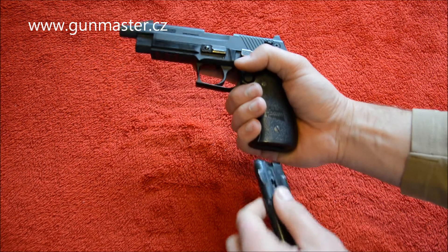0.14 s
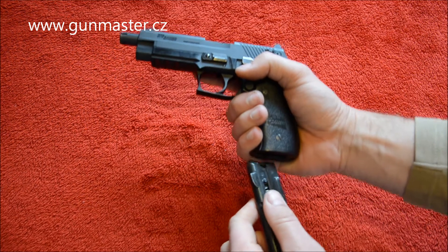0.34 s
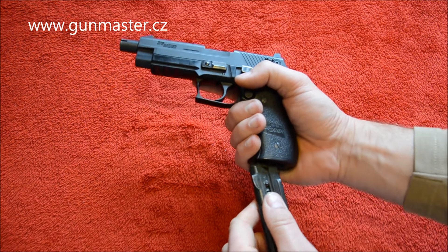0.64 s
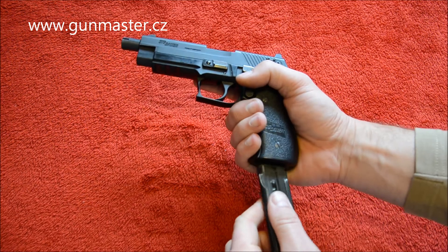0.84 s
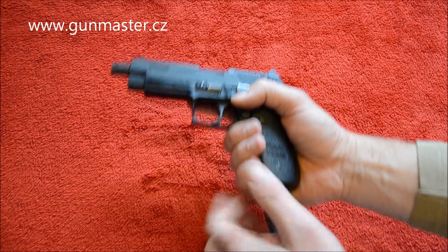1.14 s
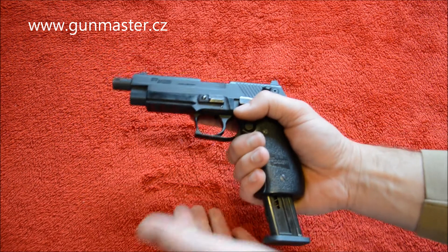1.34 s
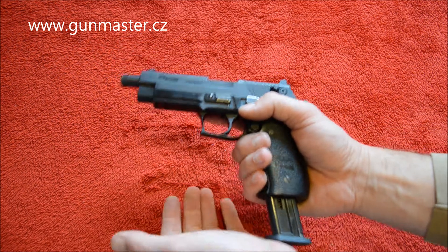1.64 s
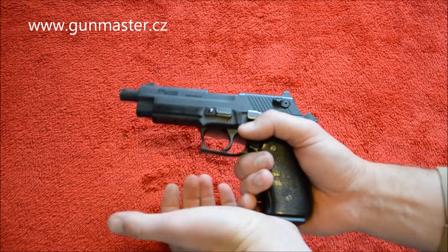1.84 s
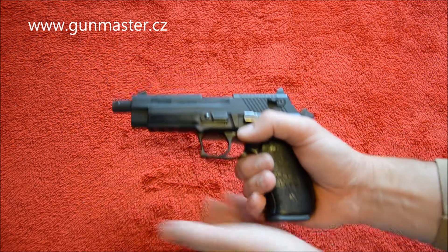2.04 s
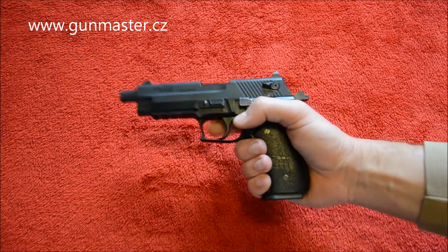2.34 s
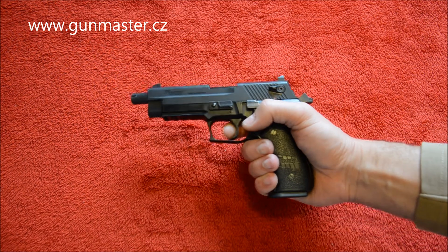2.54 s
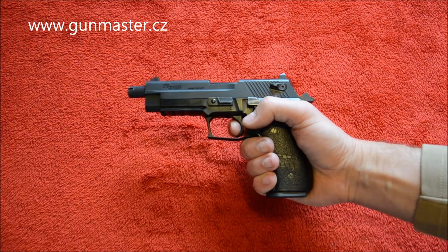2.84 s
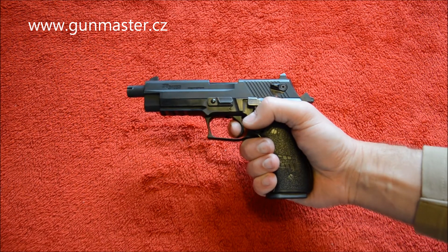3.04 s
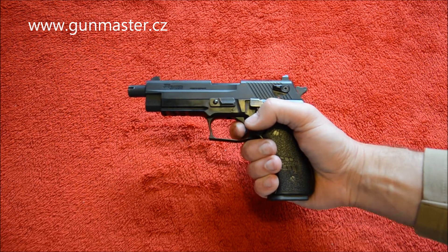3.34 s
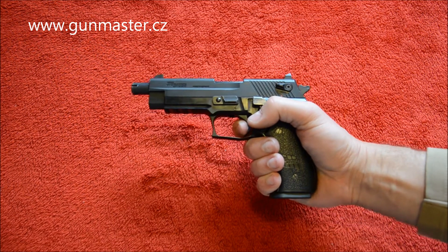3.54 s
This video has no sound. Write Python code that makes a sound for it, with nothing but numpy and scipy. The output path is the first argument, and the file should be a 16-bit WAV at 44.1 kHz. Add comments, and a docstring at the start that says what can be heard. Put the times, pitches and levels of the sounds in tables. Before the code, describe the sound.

Pistol handling: magazine rattles into the grip, is slammed home, then a sharp dry-fire click.

```python
"""Over a steady room hiss and a thin whine, a magazine slides into a small pistol's grip in jerks,
with low handling drones, and is slapped home; then a lever clicks, the trigger creeps and the hammer falls.
Each contact pushes and cracks the grip, magazine, frame and small steel parts into damped ringing, and rubbing
feeds them random grit; a hard room answers. A microphone colours it all and clips the loudest blows."""
import sys
import numpy as np
from scipy import signal
from scipy.fft import rfft, irfft
from scipy.io import wavfile
from scipy.ndimage import uniform_filter1d

SR = 44100
rng = np.random.default_rng(int(sys.argv[2]) if len(sys.argv) > 2 else 0)


def decibels_to_gain(level_db):
    """Convert a level in decibels to a linear amplitude gain (20 dB per decade)."""
    exponent = np.asarray(level_db, float) / 20
    return 10 ** exponent


def generate_wav(signal):
    """Clip the signal to [-1, 1] and save it as 16-bit WAV at the path in sys.argv[1]."""
    frames = np.transpose(np.atleast_2d(signal))
    scaled = np.clip(frames, -1, 1) * 32767
    pcm = np.round(scaled).astype(np.int16)
    wavfile.write(sys.argv[1], SR, pcm)


N = 163170

# room hiss spectrum, relative density: pitch_hz, level_db (per Hz)
HISS_SPECTRUM = [(25, -22), (60, -8), (100, -3), (300, -1.5), (500, -1.5), (1000, -8), (2000, -12),
                 (4000, -16), (7500, -23), (10000, -32.5), (15000, -35)]
# low drones of handling: start_s, length_s, pitch_hz, width_hz, level_db
DRONES = [(1.085, 0.107, 171, 24, -56.5), (1.11, 0.043, 400, 300, -49), (1.557, 0.093, 167.6, 40.2, -61),
          (1.907, 0.56, 329, 89, -62)]
# room decay: pitch_hz, t60_s
ROOM_T60 = [(300, .6), (1000, .55), (3000, .6), (6000, .5), (9000, .41), (12000, .31), (15000, .22)]
# tone of the room's answer: pitch_hz, level_db
ROOM_COLOUR = [(300, 9.5), (1000, -5.5), (3000, -4.5), (9000, -3), (15000, -3)]
# ringing modes of each body: pitch_hz, level_db (relative), t60_s
GRIP = [(798, 0, 0.024), (1083.4, -13, 0.07), (1250, 0, .018), (1520, -2.5, 0.016)]
MAGAZINE = [(2050, -4, 0.012), (2310, -0.5, 0.025), (2469, -14, .08), (2700, -2, 0.016)]
FRAME = [(3680, -2.4, 0.0067), (4220, 1, 0.0036), (5500, -2.4, 0.0056)]
STEEL = [(6860, 5, 0.0018), (8620, 9.5, 0.0034), (9900, 1.5, 0.0053), (12400, -6.5, 0.0029)]
# the grip once filled by the magazine: pitch_hz, level_db (relative), t60_s
FILLED_GRIP = [(869, -12, 0.014), (1450, -2.5, .008), (1850, -1.5, 0.01)]
BODIES = GRIP, MAGAZINE, FRAME, STEEL
# rubbing: start_s, level_db, steel_trim_db (on top of the fixed blend of bodies)
SLIDE = [(.46, -78, -35), (.52, -55, -30), (.62, -86, -8), (.935, -84, 3), (.96, -64, 0), (1.05, -57.5, 1),
         (1.075, -44.5, 11.5), (1.11, -48.5, 2), (1.16, -49.5, -7), (1.19, -82, -4.5), (1.459, -80.5, -6.5),
         (1.497, -57.5, 2.5), (1.521, -69, -8), (1.61, -66, -7), (1.65, -51.5, 0), (1.701, -76, 9),
         (2.451, -91.5, 2), (2.48, -69.5, 8), (2.51, -87, -2), (3.1, -87.5, -5.5), (3.21, -62.5, 2),
         (3.66, -65.5, -1), (3.7, -66.5, 13)]
# blows, peak level at each body: start_s, grip_db, magazine_db, frame_db, steel_db
CONTACTS = [(0.4268, -63, -56.5, -48, -55), (0.5205, -53, -56, -52, -71), (0.7296, -45.5, -64, -65, -71),
            (0.7407, -63, -55, -48, -66), (0.7683, -31, -71, -52, -61), (0.863, -31, -35, -33, -46.5),
            (0.9561, -30, -43, -53.5, -54), (0.9721, -34, -37.5, -43.5, -63),
            (1.0131, -34.5, -40, -58.5, -65), (1.0485, -32.5, -42.5, -56, -64),
            (1.066, -32, -31.5, -37.5, -54), (1.0723, -31.5, -46.5, -48, -46),
            (1.1626, -62.5, -32.5, -30, -31), (1.1711, -22.5, -33, -24, -30.5),
            (1.1761, -19.5, -26, -24, -31.5), (1.1894, -29.5, -40, -32, -52),
            (1.4712, -46, -49, -62.5, -66.5), (1.5044, -43, -49.5, -45.5, -59), (1.651, -22, -36, -36, -45),
            (1.654, -22, -28, -17.5, -24.5), (1.672, -25, -32, -26.5, -30.5), (1.684, -30, -28, -23.5, -20),
            (1.6908, -16.5, -28, -12, -17), (1.6958, -24.5, -16, -5.5, -9.5),
            (1.702, -13, -16.5, -6.5, -10), (1.7052, -27.5, -20, -24, -20), (2.4987, -24, -30, -21, -21),
            (2.5045, -38, -46, -36.5, -50), (3.0186, -71, -57, -51.5, -49), (3.123, -73, -70.5, -60.5, -53),
            (3.1383, -65.5, -56.5, -46.5, -45.5), (3.2227, -37, -42.5, -30.5, -45),
            (3.2266, -20, -24, -16, -11), (3.2278, -7.5, -15.5, 1.5, -0.5), (3.2294, -8, -16, -5.5, -5.5),
            (3.2335, -21, -32.5, -9, -13), (3.2401, -21, -31, -11, -14), (3.2456, -22.5, -18, -8, -8),
            (3.2558, -50, -24.5, -11.5, -28), (3.2606, -32.5, -30.5, -14.5, -16),
            (3.6838, -51, -57, -46, -56)]
# crack against ring as the room hears it: grip_db, magazine_db, frame_db, steel_db
ROOM_CRACK_DB = 11, -3, 19, 13
# extra sent sideways into the room: grip_db, magazine_db, frame_db, steel_db
SIDEWAYS_DB = 0, 3.5, 0, 0
# microphone housing response: pitch_hz, level_db
MIC_HOUSING = [(800, -1.5), (980, 1.5), (2150, 0.5), (3050, 5.5), (3900, 1.5), (5250, 3.5), (5750, -12),
               (5950, 2.5), (6250, 2.5), (6750, 3), (6950, -11.5), (7200, 8), (7600, 5.5), (12000, -0.5),
               (16000, -15.5)]


def colour(x, table):
    """Filter by (Hz, dB) points with a causal response from the cepstrum."""
    size = 2048
    hz, db = np.array(table).T
    f = np.maximum(np.arange(size // 2 + 1) * SR / size, 1)
    curve_db = np.interp(np.log(f), np.log(hz), db)
    cepstrum = irfft(np.log(decibels_to_gain(curve_db)))
    # fold the later half forward: minimum phase
    cepstrum[1:size // 2] *= 2
    cepstrum[size // 2 + 1:] = 0
    response = irfft(np.exp(rfft(cepstrum)))
    return signal.fftconvolve(x, response)[:len(x)]


def unit(x):
    """Scale to rms 1."""
    return x / np.sqrt(np.mean(x ** 2))


def walk(rate_hz):
    """Random levels of rms 1, held 1 / rate_hz seconds and slewed twice."""
    hold = int(SR / rate_hz)
    steps = np.repeat(rng.standard_normal(N // hold + 1), hold)
    smooth = uniform_filter1d(uniform_filter1d(steps, hold), hold)
    return unit(smooth[:N])


def band(x, lo_hz, hi_hz):
    """Band-pass."""
    sos = signal.butter(3, [lo_hz, min(hi_hz, SR / 2.2)], "band", fs=SR, output="sos")
    return signal.sosfilt(sos, x)


def split(x, centres_hz):
    """Bands with overlapping slopes on a log axis that add up to x again."""
    count = len(centres_hz)
    hz = np.arange(len(x) // 2 + 1) * SR / len(x) + 1
    place = np.interp(np.log(hz), np.log(centres_hz), np.arange(count))
    spectrum = rfft(x)
    slopes = (np.cos(np.pi / 2 * np.clip(place - k, -1, 1)) ** 2 for k in range(count))
    return [irfft(spectrum * slope, len(x)) for slope in slopes]


def hiss():
    """Steady room hiss as coloured noise; what is heard above 2 kHz wavers in level as one, and each octave
    flickers a little."""
    level_db, swell_db, flicker_db = -62, 1.5, 0.7
    centres_hz = 30 * 2. ** np.arange(10)
    swell = walk(25)
    bands = split(colour(rng.standard_normal(N), HISS_SPECTRUM), centres_hz)
    total = np.zeros(N)
    for octave, hz in zip(bands, centres_hz):
        total += octave * decibels_to_gain(swell_db * swell * (hz > 2000) + flicker_db * walk(20))
    return decibels_to_gain(level_db) * unit(total)


def drones():
    """Brief low wavering tones while the hands move: narrow noise under rounded fades."""
    t = np.arange(N) / SR
    out = np.zeros(N)
    for start_s, length_s, hz, width_hz, db in DRONES:
        progress = np.clip((t - start_s) / length_s, 0, 1)
        fade = np.sqrt(np.sin(np.pi * progress).clip(0))
        tone = unit(band(rng.standard_normal(N), hz - width_hz / 2, hz + width_hz / 2))
        out += decibels_to_gain(db) * fade * tone
    return out


def room(x):
    """Diffuse tail: noise whose bands die at their own rates."""
    gain_db, start_s, build_s = -4, 0.0012, 0.00047
    t = np.arange(SR) / SR
    centres_hz = 150 * 2 ** np.arange(0, 7, .25)
    table_hz, table_t60 = np.array(ROOM_T60).T
    t60 = np.interp(np.log(centres_hz), np.log(table_hz), table_t60)
    bands = split(rng.standard_normal(SR), centres_hz)
    tail = sum(b * np.exp(-np.log(1000) * t / d) for b, d in zip(bands, t60))
    tail = tail * (1 - np.exp(-np.maximum(t - start_s, 0) / build_s))
    tail = colour(tail / np.sqrt(np.sum(tail ** 2)), ROOM_COLOUR)
    return decibels_to_gain(gain_db) * signal.fftconvolve(x, tail)[:N]


def ring(modes, chance):
    """Damped modes of one body; chance shifts their levels and pitches, as each blow lands elsewhere."""
    scatter_db, scatter_hz_share = 2, .018
    t = np.arange(4400) / SR
    out = np.zeros(t.size)
    for k, ((hz, db, t60), (level_chance, pitch_chance)) in enumerate(zip(modes, chance)):
        pitch_hz = hz * (1 + scatter_hz_share * pitch_chance)
        tone = np.sin(2 * np.pi * pitch_hz * t) * np.exp(-np.log(1000) * t / t60)
        out += decibels_to_gain(db + scatter_db * level_chance) * tone * (-1) ** k  # signs alternate
    return out


def sliding():
    """Dense grit of rubbing surfaces, catching and slipping, excites the bodies."""
    grit_per_s, grit_db, slip_db = 5000, 2.8, 4
    t = np.arange(N) / SR
    start_s, level_db, steel_trim_db = np.array(SLIDE).T
    grains = (rng.random(N) < grit_per_s / SR) * rng.standard_normal(N)
    grit = grains * decibels_to_gain(grit_db * rng.exponential(size=N) + slip_db * walk(120))
    still = np.zeros((5, 2))  # no scatter of the modes
    grip, magazine, frame, steel = (
        unit(signal.fftconvolve(grit, ring(body, still))[:N]) for body in BODIES)
    steel_gain = decibels_to_gain(np.interp(t, start_s, steel_trim_db) - 12.5)
    blend = decibels_to_gain(-6.5) * grip + decibels_to_gain(-6.5) * magazine + decibels_to_gain(-3.5) * frame + steel_gain * steel
    return decibels_to_gain(np.interp(t, start_s, level_db)) * blend


def strike(body, push, crack, chance, crack_db):
    """A push rings the body's modes; a crack covers the body's range."""
    y = np.convolve(ring(body, chance), push)
    crack = band(crack, body[0][0] / 1.2, body[-1][0] * 1.2)
    y = y / np.abs(y).max()
    y[:crack.size] += decibels_to_gain(crack_db) * crack / np.abs(crack).max()
    return y


def contacts():
    """Rough blows as sent to the microphone, and their average over all directions on paths into the room."""
    push_ms, crack_ms, crack_db, paths = .12, 0.9, -2.5, 6
    seated_s, seated_t60_share = 2.0, .2  # from then on the latched magazine is damped
    direct, around = np.zeros(N + SR), np.zeros((paths, N + SR))
    noise = rng.standard_normal((len(CONTACTS), 5, 256))
    chances = rng.standard_normal((len(CONTACTS), 4, 5, 2))
    ms = np.arange(256) / SR * 1000
    push_shape = ms * np.exp(-ms / push_ms)
    crack_shape = ms * np.exp(-2 * ms / crack_ms)
    tap = (ms == 0).astype(float)
    damped = [(hz, db, t60 * seated_t60_share) for hz, db, t60 in MAGAZINE]
    latched = FILLED_GRIP, damped, FRAME, STEEL
    for k, ((start_s, *levels_db), (push, *cracks), chance) in enumerate(zip(CONTACTS, noise, chances)):
        bodies = latched if start_s > seated_s else BODIES
        i = int(start_s * SR)
        for body, db, crack, body_chance, room_crack_db, side_db in zip(
                bodies, levels_db, cracks, chance, ROOM_CRACK_DB, SIDEWAYS_DB):
            blow = strike(body, push * push_shape, crack * crack_shape, body_chance, crack_db)
            blow = decibels_to_gain(db) * blow / np.abs(blow).max()
            direct[i:i + blow.size] += blow
            # the average is a clean tap of random sign, matched in energy to the blow
            mean = np.sign(crack[0]) * strike(body, tap, tap, body_chance / 2, room_crack_db)
            match = np.sqrt(np.sum(blow ** 2) / np.sum(mean ** 2))
            around[k % paths, i:i + blow.size] += decibels_to_gain(side_db) * mean * match
    return direct[:N], around[:, :N]


def scene():
    """Pistol (too small to radiate bass), its echo in the room, handling drones and hiss."""
    direct, around = contacts()
    rub = sliding()
    heard = direct + rub + room(rub) + sum(room(path) for path in around)
    no_bass = signal.butter(4, 320, "high", fs=SR, output="sos")  # Hz
    pistol = signal.sosfilt(no_bass, heard)
    return (pistol + drones() + hiss())[None]


def band_limit(x):
    """A steep low-pass at the top of the band."""
    return signal.sosfilt(signal.butter(12, 16160, fs=SR, output="sos"), x)


def record(dry):
    """Housing colour, a thin steady whine of the electronics, lopsided overload that thumps, hard clipping."""
    whine_hz, whine_rms_db = 15690.2, -73.5
    square_share, clip_level = .085, 1.0
    whine = decibels_to_gain(whine_rms_db) * np.sqrt(2) * np.sin(2 * np.pi * whine_hz * np.arange(N) / SR)
    x = colour(dry[0], MIC_HOUSING) + whine
    overloaded = x + square_share * x ** 2
    finished = np.clip(overloaded, -clip_level, clip_level)
    return band_limit(finished[None])


dry = scene()
out = record(dry)
generate_wav(out)
```